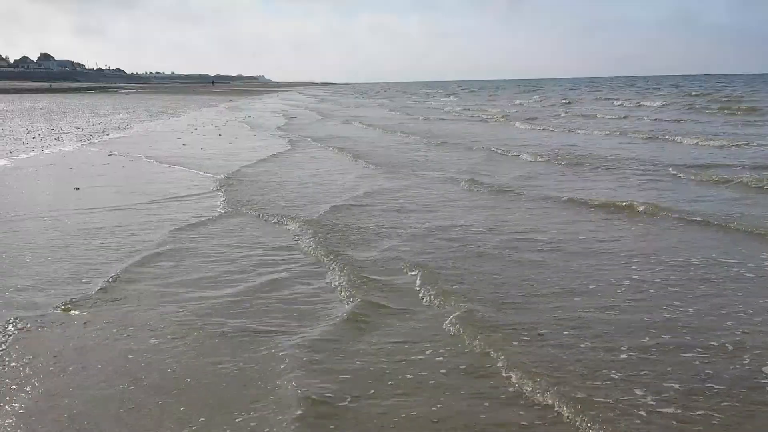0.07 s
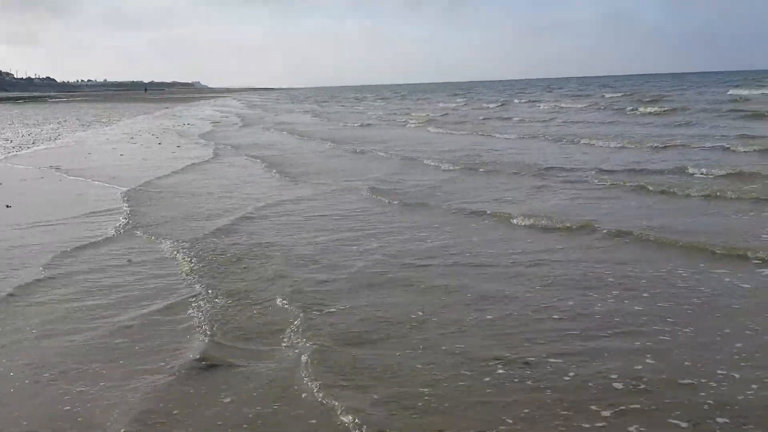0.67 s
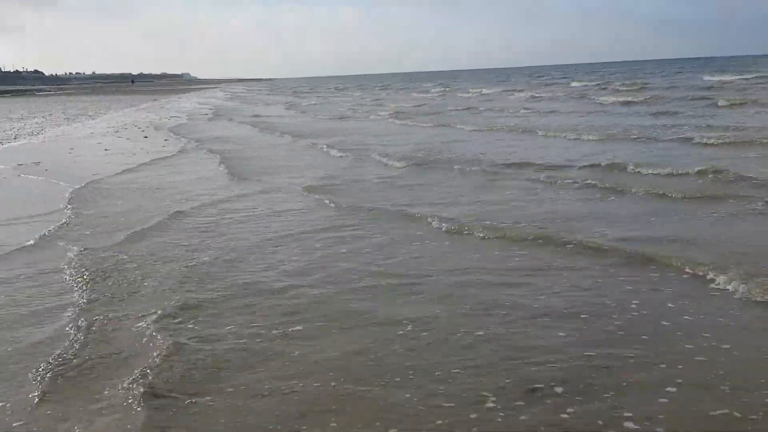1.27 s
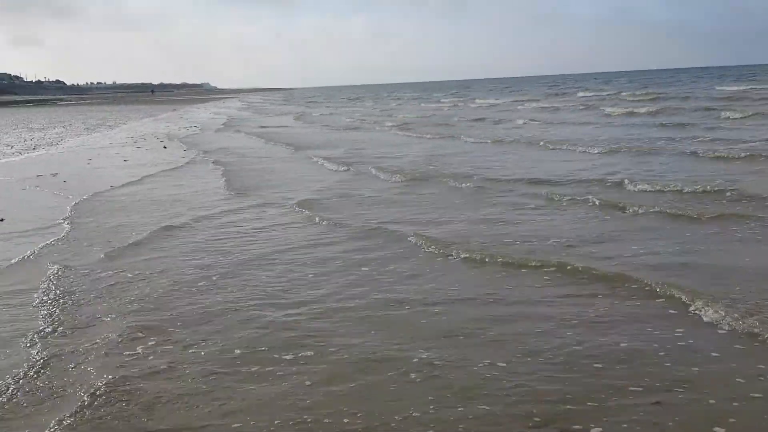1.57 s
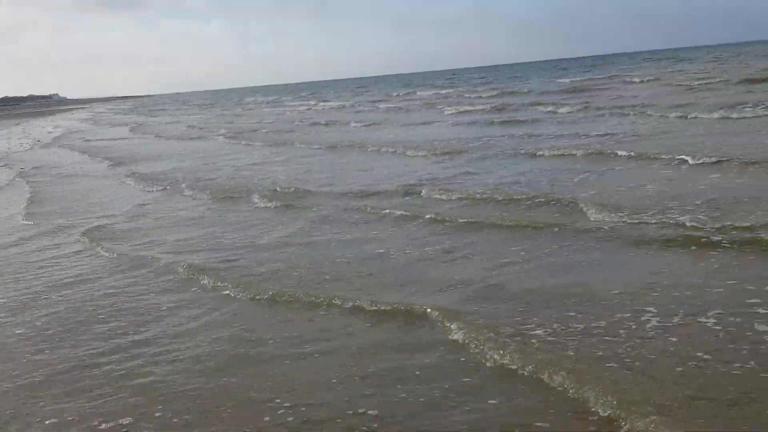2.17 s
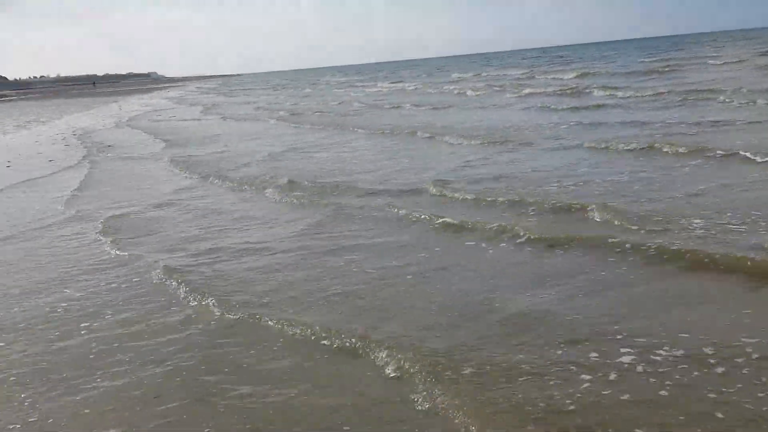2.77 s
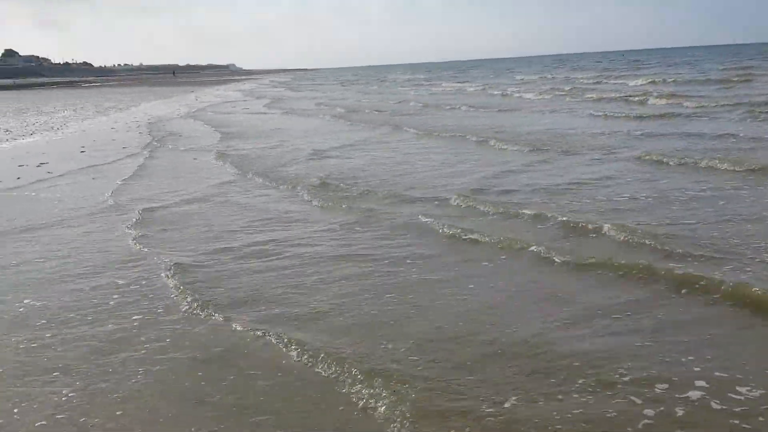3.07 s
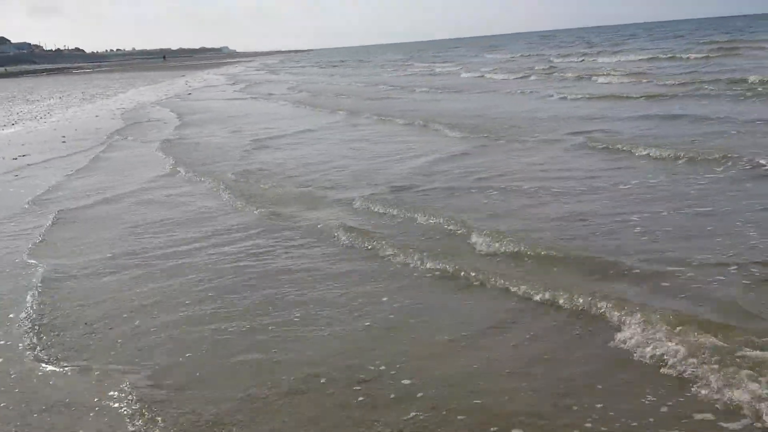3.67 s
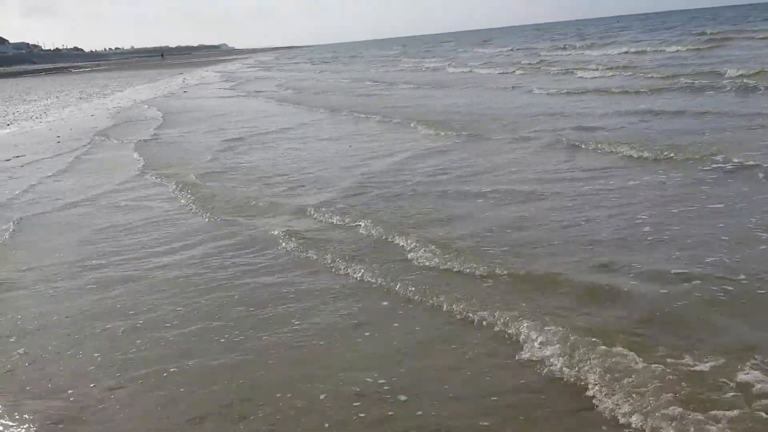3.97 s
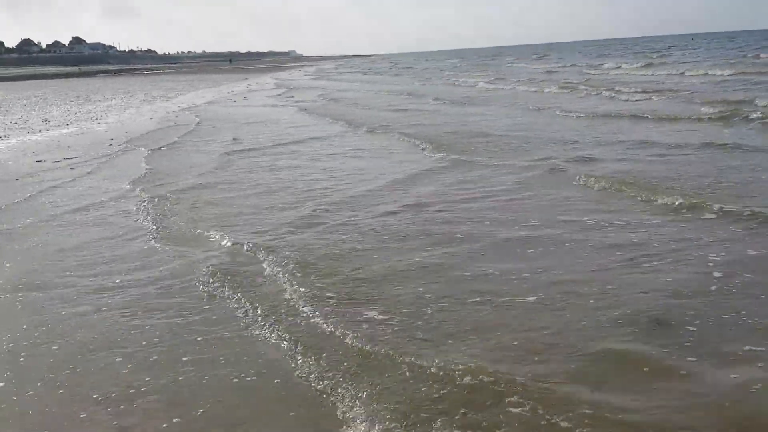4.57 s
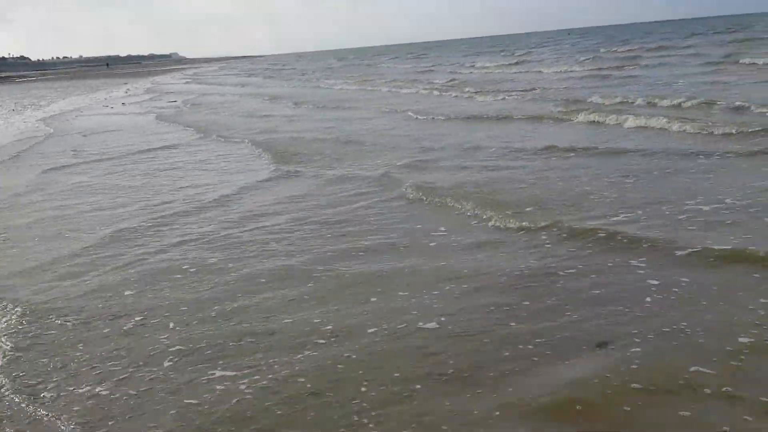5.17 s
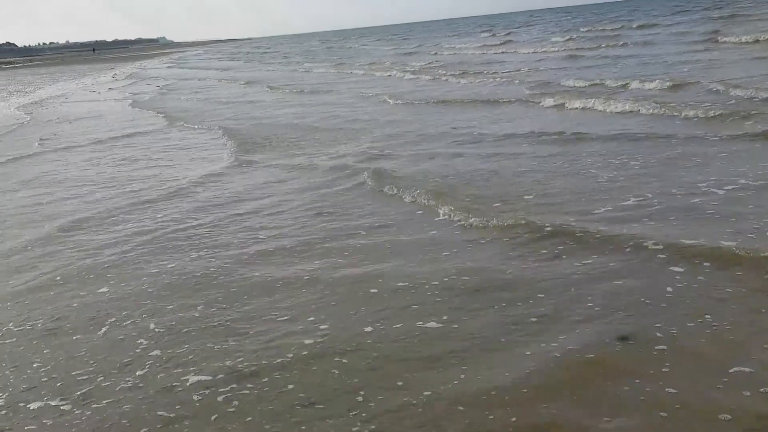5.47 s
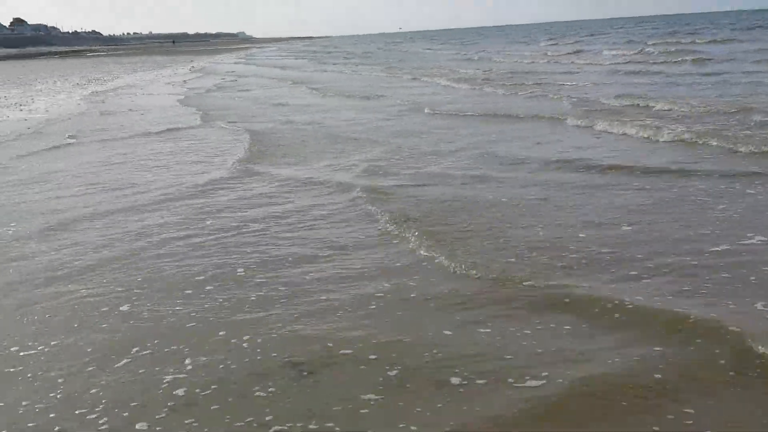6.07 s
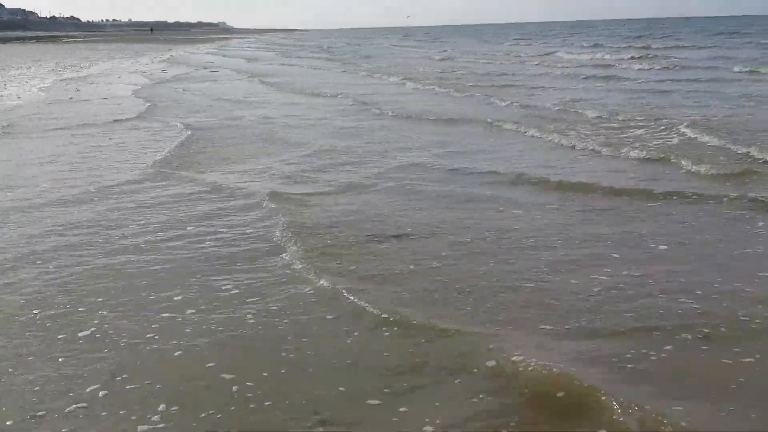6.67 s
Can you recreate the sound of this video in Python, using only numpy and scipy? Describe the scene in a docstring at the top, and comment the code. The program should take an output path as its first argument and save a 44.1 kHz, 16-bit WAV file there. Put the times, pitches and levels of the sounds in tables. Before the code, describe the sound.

After a brief silence, wind and shallow surf come in at about 0.4 seconds. Small waves wash up a flat sandy beach in a continuous foamy rush, swelling with fizz, bubbles and light gurgling as each crest breaks, around 1, 1.8, 2.5, 3.2, 4.8, 5.5 and just after 6 seconds. Tiny close drops tick and splash here and there, notably near 2 and 2.7 seconds, with a few small bubble plops around 3.4 seconds. From about 0.6 seconds a gusty sea breeze buffets the microphone, its low, uneven rumble often louder than the water and shifting between left and right. The gusts break into short rough puffs, thickest and raspiest from about 3.4 to 5.3 seconds. Wind and wash continue until the end at about 7 seconds.

```python
"""Small waves spill and wash up a flat sandy beach: a steady rush of foam, bubbles that thicken
as each crest builds and breaks, a few near drops. A gusty sea breeze buffets the two microphone
ports separately, rumbling and breaking into short rough puffs. The left port is a small cavity
that rings near 6 kHz and colours the water on that side."""
import sys
import numpy as np
from scipy import signal
from scipy.fft import rfft, irfft, next_fast_len
from scipy.io import wavfile
from scipy.ndimage import uniform_filter1d, map_coordinates

SR = 44100
rng = np.random.default_rng(int(sys.argv[2]) if len(sys.argv) > 2 else 0)


def unload_wav(signal):
    """Save mono or channel-first audio to the path in sys.argv[1] as 16-bit WAV at rate SR, clipped to [-1, 1]."""
    wavfile.write(
        sys.argv[1],
        SR,
        np.round(np.clip(np.atleast_2d(signal).T, -1, 1) * 32767).astype(np.int16),
    )


N = 305613

# fineness of the turbulence, as base corner of the rumble: t/s, f/Hz
TURBULENCE = [(0.45, 220), (1.35, 272), (1.8, 254), (2.4, 250), (3.0, 282), (3.7, 316), (4.4, 336),
              (5.0, 342), (5.6, 270), (6.3, 268), (6.9, 229)]
# wind pressure on each port: t/s, level/dB
LEFT_GUSTS = [(0.44, -37), (0.63, -13.5), (0.72, -13), (0.82, -15), (1.07, -17.5), (1.16, -8.5),
              (1.22, -22), (1.35, -12.5), (1.52, -17), (1.67, -21), (1.73, -15.5), (1.79, -21), (1.88, -19),
              (2.33, -28.5), (2.39, -19), (2.51, -11.5), (2.6, -21.5), (2.87, -11), (2.96, -16),
              (3.44, -15), (3.82, -16), (3.92, -23), (4.04, -24), (4.1, -15.5), (4.28, -12.5), (4.52, -19),
              (4.66, -11.5), (5.2, -27.5), (5.26, -16), (5.36, -32), (5.41, -20), (5.71, -16.5),
              (5.77, -18.5), (5.92, -12.5), (6.16, -18), (6.28, -12), (6.34, -19), (6.46, -12), (6.64, -28),
              (6.7, -22), (6.93, -12.5)]
RIGHT_GUSTS = [(0.44, -33.5), (0.62, -18.5), (0.77, -24.5), (0.95, -14.5), (1.13, -26), (1.28, -8.5),
               (1.34, -22), (1.56, -14), (1.7, -24.5), (1.88, -18.5), (1.94, -12.5), (2.0, -20.5),
               (2.12, -15), (2.21, -27), (2.63, -18.5), (2.9, -19), (2.96, -14), (3.26, -12.5), (3.44, -24),
               (3.5, -14), (3.648, -15), (3.83, -12), (4.13, -20.5), (4.4, -20), (4.46, -17), (4.6, -22),
               (4.81, -14.5), (5.17, -16), (5.23, -30), (5.26, -16), (5.47, -27.5), (5.53, -15),
               (5.62, -31), (5.68, -16), (5.72, -24), (5.86, -20.5), (6.3, -17.5), (6.55, -16.5),
               (6.65, -22), (6.93, -19)]
TYPICAL_GUST_DB, TYPICAL_CORNER_HZ = -8.5, 291
# near wavelets: break t/s, level/dB, build/s, hold/s, fall/s, fizz/dB, spray delay/s, churn/dB
# the abrupt falls near 4.25, 4.87 and 6.43 s stand for a limiter ducking under wind puffs
WAVELETS = [(0.52, -38.5, 0.11, 0.12, 0.023, 0, .05, -55), (1.02, -35, 0.13, 0.076, 0.1, 4.5, 0.085, -47),
            (1.43, -42, 0.015, 0.033, 0.024, -1, .03, -48), (1.76, -38, 0.22, 0.14, 0.041, 3, 0.061, -36),
            (2.55, -36, 0.055, 0.2, 0.013, 3.5, 0.025, -41),
            (3.22, -40.5, 0.068, 0.18, 0.038, 3, 0.09, -40.5), (3.98, -45, 0.037, .26, 0.01, 3.5, .01, -48),
            (4.77, -40.5, 0.29, 0.092, 0.01, 0.5, .01, -43), (5.55, -42.5, 0.19, 0.037, 0.1, 3, 0.011, -54),
            (6.10, -39.5, 0.077, 0.071, .012, -0.5, .02, -44),
            (6.26, -39, 0.13, .16, 0.014, 1.5, 0.024, -44), (6.91, -57, 0.034, .05, .03, 5.5, .02, -53)]


def amp(db):
    """Decibels to gain."""
    return 10 ** (np.asarray(db) / 20)


def unit(x):
    """Scale to rms 1."""
    return x / np.sqrt(np.mean(x ** 2) + 1e-20)


def levelled(x):
    """Scale to a running rms of 1."""
    return x / np.sqrt(np.abs(uniform_filter1d(x ** 2, size=2800)) + 1e-9)


def along(points, hz):
    """Read (f/Hz, value) points on a log axis."""
    point_hz, values = np.transpose(points)
    return np.interp(np.log(hz + 1), np.log(point_hz + 1), values)


def curve(points):
    """Read (t/s, value) points at every sample."""
    return np.interp(np.arange(N) / SR, *np.transpose(points))


def wobble(knots_per_s):
    """Smooth random curve."""
    knots = rng.standard_normal(8192)
    return map_coordinates(knots, [np.arange(N) * knots_per_s / SR], mode="wrap")


def filtered(x, response):
    """Apply a gain given as a function of f/Hz."""
    n_fft = next_fast_len(N + 8192)
    return irfft(rfft(x, n_fft) * response(np.fft.rfftfreq(n_fft, 1 / SR)), n_fft)[..., :N]


def coloured(x, spectrum):
    """Shape by (f/Hz, level/dB) points, to rms 1."""
    return unit(filtered(x, lambda hz: amp(along(spectrum, hz))))


def add(track, at_s, sound):
    """Mix a sound into a track."""
    part = track[..., max(round(at_s * SR), 0):][..., :sound.shape[-1]]
    part += sound[..., :part.shape[-1]]


def rumble(gusts, boom):
    """Turbulence at one port: harder wind makes smaller eddies, so the rumble reaches higher."""
    # turbulence spectrum; extra boom of the left port: f/Hz, level/dB
    spectrum = [(15, -39), (30, -36), (50, -13.5), (80, -4.5), (125, 0), (250, -2), (500, -7.5),
                (1000, -13.5), (2500, -25)]
    left_boom = [(30, 17.5), (70, 7), (150, 0), (400, -0.5)]
    buffet_db = 2.5 * wobble(24)
    pressure_db = curve(gusts) - 0.6 + buffet_db
    corner_hz = curve(TURBULENCE) * amp(0.29 * (pressure_db + 14.5) + 2.52 * wobble(110))
    noise = coloured(rng.standard_normal(N), spectrum)
    noise = filtered(noise, lambda hz: amp(boom * along(left_boom, hz)))
    # moving low-pass, by octave bands
    band_hz = 40 * 2 ** np.arange(7)[:, None]
    bands = filtered(noise, lambda hz: np.clip(1 - np.abs(np.log2(np.maximum(hz, 40) / band_hz)), 0, 1))
    flow = levelled(np.sum(bands / np.sqrt(1 + (band_hz / corner_hz) ** 4), axis=0))
    # pressure grows faster than air speed: fast swirls become lopsided kicks
    kicks = flow * (1 + 0.29 * np.abs(flow)) - 0.1 * (flow ** 2 - 1)
    # the slowest swells below about 24 Hz fall away
    vented = filtered(kicks, lambda hz: hz ** 2 / (hz ** 2 + 24 ** 2))
    return levelled(vented) * amp(pressure_db)


def lesser_eddies(port, count=160, typical_db=-22, scatter_db=8, typical_s=0.0028):
    """Random eddy rows for one port, stronger in gusts and in fine turbulence."""
    place, size, stretch = rng.uniform(-0.944, 1, (count, 3)).T
    at = ((np.arange(count) + (place + 1) / 2) / count * (N - 1)).astype(int)
    gust_db = curve((LEFT_GUSTS, RIGHT_GUSTS)[port])[at] - TYPICAL_GUST_DB
    fineness_oct = np.log2(curve(TURBULENCE)[at] / TYPICAL_CORNER_HZ)
    level_db = typical_db + 0.39 * gust_db + 4.5 * fineness_oct + scatter_db * size
    return list(zip(at / SR, np.full(count, port), level_db, typical_s * 2 ** stretch))


def puffs(rasp_hz=900, rasp_db_per_oct=9):
    """Eddies tear past one port as ragged pressure bursts, raspier in fine turbulence."""
    # strongest eddies: t/s, port (0 left, 1 right), level/dB, length/s
    strong_eddies = [(0.583, 0, -19, 0.0043), (0.678, 0, -5, 0.0025), (0.944, 1, -17, 0.0056),
                     (1.128, 0, -8.5, 0.0016), (1.166, 0, -11.5, 0.007), (1.226, 1, -13, .004),
                     (1.265, 1, -21, 0.013), (1.57, 1, -18, 0.0064), (1.938, 1, -6.5, 0.0073),
                     (2.15, 1, -12, 0.0057), (2.61, 1, -12.5, 0.015), (2.944, 1, -9.5, 0.0037),
                     (3.015, 1, -5, 0.0013), (3.074, 0, -13, 0.0048), (3.33, 0, -14, 0.015),
                     (3.397, 0, -9, 0.0022), (3.42, 0, -8.5, .003), (3.447, 0, -7, 0.0035),
                     (3.501, 1, -10, 0.0036), (3.508, 0, -9, 0.002), (3.519, 1, -11, 0.0046),
                     (3.537, 1, -8, 0.0028), (3.543, 1, -2, 0.0027), (3.585, 0, -17, .003),
                     (3.687, 0, -10, 0.0022), (3.752, 1, -9.5, 0.0042), (3.765, 1, -10, 0.0018),
                     (3.799, 1, -5.5, 0.0024), (3.809, 1, -5.5, 0.0038), (3.815, 0, -4, 0.0022),
                     (3.846, 1, -5, .002), (3.86, 1, -14, 0.0051), (3.902, 1, -0.5, 0.0018),
                     (3.958, 1, -4, 0.0017), (3.963, 1, -10, 0.0014), (4.023, 1, -12.5, .003),
                     (4.077, 1, -11, 0.004), (4.103, 0, -6.5, 0.0047), (4.15, 0, -14.5, 0.0057),
                     (4.17, 1, -18, 0.0039), (4.209, 0, -7, 0.0037), (4.218, 0, -13, 0.0026),
                     (4.222, 1, -11, 0.0033), (4.258, 0, -16, 0.0036), (4.321, 0, -20, .004),
                     (4.352, 0, -11.5, 0.013), (4.384, 0, -10.5, 0.0033), (4.444, 0, -11.5, 0.011),
                     (4.462, 1, -12, 0.0032), (4.475, 1, -9, .008), (4.485, 1, -8, 0.0036),
                     (4.551, 0, -19, 0.011), (4.688, 0, -21, 0.016), (4.709, 1, -9, 0.006),
                     (4.767, 0, -20, .01), (4.783, 1, -14, .003), (4.795, 1, -11, 0.0048),
                     (4.837, 1, -12, 0.0034), (4.844, 1, -15, 0.0033), (4.846, 0, -18.5, 0.026),
                     (4.884, 0, -8.5, 0.004), (4.89, 0, 0.5, 0.0026), (4.921, 1, -11, 0.003),
                     (4.932, 1, -14.5, .002), (5.001, 1, -10.5, 0.003), (5.076, 1, -19, 0.0062),
                     (5.139, 1, -11.5, 0.0038), (5.169, 1, -9, 0.007), (5.199, 1, -6, 0.0018),
                     (5.29, 1, -17, 0.015), (5.308, 1, -15, 0.0042), (5.319, 1, -9.5, 0.0042),
                     (5.335, 1, -13, 0.011), (5.489, 0, -14.5, 0.0046), (5.663, 1, -18, 0.018),
                     (5.806, 0, -12, 0.0075), (5.864, 1, -7, 0.0031), (5.911, 0, -17.5, 0.015),
                     (5.979, 0, -7.5, 0.0034), (6.052, 0, -11, 0.0046), (6.195, 0, -5.5, 0.0035),
                     (6.245, 0, -8, 0.011), (6.318, 1, -9, 0.011), (6.471, 1, -13, 0.0093),
                     (6.564, 1, -10.5, .005), (6.571, 0, -12.5, 0.005)]
    # puff spectrum: f/Hz, level/dB
    spectrum = [(60, -1), (150, -8.5), (300, 6.5), (500, 3), (750, -3), (1050, -8), (1500, -17.5),
                (2200, -30.5), (4000, -71), (8000, -80)]
    out, t = np.zeros((2, N)), np.arange(N) / SR
    ragged = amp(4 * np.array([wobble(170), wobble(170)]))
    flutter = coloured(rng.standard_normal((2, N)), spectrum)
    rasp = filtered(flutter, lambda hz: 1 / (1 + (rasp_hz / (hz + 1)) ** 4))
    rasp_gain = amp(rasp_db_per_oct * np.log2(curve(TURBULENCE) / TYPICAL_CORNER_HZ))
    flutter = ragged * (flutter + rasp * (rasp_gain - 1))
    for at_s, port, level_db, length_s in strong_eddies + lesser_eddies(0) + lesser_eddies(1):
        near = slice(*np.searchsorted(t, [at_s - 5 * length_s, at_s + 5 * length_s]))
        swell = 1 / (1 + 2.44 * ((t[near] - at_s) / length_s) ** 2) ** 1.15  # tight core, weak skirt
        burst = unit(swell * flutter[int(port), near]) * np.sqrt(np.mean(swell ** 2))
        out[int(port), near] += amp(level_db) * burst
    return out


def drops(attack_s=0.0006):
    """Near drops open the surface and smack with a tiny burst of spray, small ones brighter."""
    # impacts: t/s, level/dB, tilt/(dB/octave), t60/s, left minus right/dB
    impacts = [(0.7086, -16.5, -2, 0.013, 12.5), (1.017, -19, 3, .018, -3), (1.09, -16, 0, .02, 0),
               (1.123, -14, 1, .02, 5), (1.134, -17, -3, .012, 4), (1.152, -17, 2, .015, 7),
               (1.186, -17.5, 5, .018, 0), (1.208, -14.5, -5, 0.013, 2), (1.219, -19, -9.5, 0.015, 2),
               (1.325, -22, -6, .012, 4), (1.423, -19, 1, 0.02, 3), (1.463, -24, 12, .018, 2),
               (1.551, -19, -2, 0.015, 5), (1.612, -15.5, -5, 0.034, 1), (1.755, -28, 0, .01, -6),
               (1.895, -19, 2, .012, 2), (1.980, -13, -2, 0.013, -3), (1.9916, -6, -2, 0.0093, 2),
               (2.013, -18.5, -2, 0.019, 0), (2.111, -31, 9, .01, 0), (2.567, -15, 5, .014, -2),
               (2.612, -14, -7, 0.019, -5), (2.621, -14, 0, .012, 0), (2.662, -15, 5, 0.022, 0),
               (2.724, -14, 4, .012, 2), (2.732, -15.5, 8, .01, 2), (2.745, -16, 4, 0.013, -4),
               (2.774, -20, -2, .014, 2), (3.117, -24, 3, .012, -2), (3.304, -19, 7, .016, -2),
               (3.363, -15, -4, 0.021, -3), (3.402, -16, -3, 0.013, 2), (3.455, -16, -3, 0.013, -1),
               (3.469, -19, -7, 0.016, 1), (3.925, -29, 10, .012, -7), (3.977, -21, 1, .012, 4),
               (4.252, -23, 5, 0.011, -9), (4.729, -23, 3, .012, -5), (4.774, -22, 13, .012, 3),
               (4.822, -20, 3, .012, -3), (4.852, -17, -7, 0.02, 0), (5.246, -31, 12, .014, -3),
               (5.381, -21.5, -6, .012, -1), (5.47, -29, 8, .012, -5), (5.538, -22.5, 0, .012, -2),
               (5.548, -23, 10, .012, 0), (5.789, -35, 11, 0.011, 0), (6.153, -22, -7, .012, 7),
               (6.168, -21, -2, .014, 4), (6.243, -18, 5, 0.011, -5), (6.33, -20, -2, .014, 4),
               (6.341, -19, 8, 0.016, -2), (6.367, -19, 9, .016, -2), (6.413, -27, 14, .014, -3),
               (6.478, -30, 11, .012, -3), (6.739, -25, 0, .012, 1), (6.888, -24, -4, .012, 5)]
    colour_hz_db = [(1000, -3), (4000, -5.5), (7000, 6.5), (10000, -5), (15000, -18)]
    out, t = np.zeros((2, N)), np.arange(SR // 25) / SR
    octaves = np.log2(np.clip(np.fft.rfftfreq(len(t), 1 / SR), 2000, 12000) / 6000)
    for at_s, level_db, tilt_db, t60_s, pan_db in impacts:
        spray = irfft(rfft(rng.standard_normal((2, len(t)))) * amp(tilt_db * octaves), len(t))
        sides = amp([[pan_db / 2], [-pan_db / 2]])
        envelope = amp(level_db - 60 * t / t60_s) * (1 - np.exp(-t / attack_s))
        add(out, at_s, sides * envelope * spray)
    return filtered(out, lambda hz: amp(along(colour_hz_db, hz)))


def gulps(attack_s=0.00035):
    """Air trapped under a crest rings with a rising bubble note."""
    # air pockets: t/s, f/Hz, level/dB, t60/s
    pockets = [(1.322, 2250, -31, 0.014), (1.613, 2270, -30, 0.018), (1.655, 1890, -32, 0.021),
               (2.775, 1923, -29, 0.02), (2.794, 1460, -23.5, 0.025), (2.808, 1580, -32, 0.017),
               (3.186, 2060, -20, 0.014), (3.357, 1530, -11, 0.0073), (3.371, 2290, -15.5, 0.019),
               (3.378, 2660, -21, .011), (4.102, 3880, -26, .025), (4.214, 2000, -25, 0.016),
               (5.019, 1760, -20, 0.0099), (5.579, 3700, -10.5, 0.004), (5.583, 3000, -28, .02),
               (5.600, 2600, -24, .015), (6.150, 2380, -25, .015)]
    out, t = np.zeros((2, N)), np.arange(SR // 25) / SR
    for at_s, hz, level_db, t60_s in pockets:
        note = np.sin(2 * np.pi * hz * t * (1 + 0.1 * np.minimum(t / t60_s, 1)))
        envelope = amp(level_db - 60 * t / t60_s) * (1 - np.exp(-t / attack_s))
        add(out, at_s, envelope * note)
    return out


def bubbles(count, centre_hz, spread, cycles, scatter_db, rise, samples):
    """Stereo bubble cloud at rms 1: damped sines whose pitch rises as they near the surface."""
    t = np.arange(samples) / SR
    when, where, polarity = rng.random((3, count, 1))
    hz = np.clip(centre_hz * np.exp(spread * rng.standard_normal((count, 1))), 500, 16000)
    gain = amp(scatter_db * np.minimum(rng.exponential(size=(count, 1)), 4.5))
    age = hz * t / cycles
    envelope = gain * np.exp(-age) * (1 - t / t[-1])
    ring = envelope * np.sin(2 * np.pi * hz * t * (1 + rise * np.minimum(age, 2)))
    ring *= np.sign(polarity - 0.5) * np.sqrt(hz / centre_hz)
    at = (when * N).astype(int) + np.arange(samples)
    lag = (where * 28).astype(int)  # wide shore: each bubble has its own delay between the ports
    left = np.bincount((at + 14).ravel(), ring.ravel(), N)[:N]
    right = np.bincount((at + lag).ravel(), ring.ravel(), N)[:N]
    return unit(np.array([left, right]))


def foam(patchy_db):
    """Countless far bubbles merge into a patchy white rush, partly shared by both ports."""
    # left-right likeness: f/Hz, correlation/0-1
    correlation = [(300, 1), (1500, 0.21), (4000, 0.22), (8000, 0.07)]
    spectra = signal.stft(rng.standard_normal((2, N)), nperseg=512)[2]
    patches = uniform_filter1d(rng.standard_normal(spectra.shape[1:]), size=7, axis=0)
    patches = uniform_filter1d(patches, size=6, axis=1)
    pair = signal.istft(spectra * amp(patchy_db * unit(patches)), nperseg=512)[1][:, :N]
    width_rad = lambda hz: np.arccos(np.clip(along(correlation, hz), -1, 1)) / 2
    mid, side = filtered(pair, lambda hz: np.array([np.cos(width_rad(hz)), np.sin(width_rad(hz))]))
    return unit(np.array([mid + side, mid - side]))


def wavelet_swell(break_s, build_s, hold_s, fall_s):
    """Envelope of a wavelet's sound: it builds, holds and falls away."""
    t = np.arange(N) / SR - break_s
    return np.exp(np.minimum(t, 0) / build_s - np.maximum(t - hold_s, 0) / fall_s)


def churning():
    """Toppling wavelets fold in large bubbles that give a hollow midrange."""
    swell = sum(amp(churn_db) * wavelet_swell(break_s, build_s, hold_s, fall_s)
                for break_s, _, build_s, hold_s, fall_s, _, _, churn_db in WAVELETS)
    return swell * bubbles(2200, 1427, spread=0.36, cycles=5.3, scatter_db=1, rise=0.062, samples=360)


def sea_state(wash_fizz_db=-1.8):
    """Water level and fizz in dB: wavelets ride on the duller wash, each followed by its spray."""
    # wash along the whole shore: t/s, level/dB
    wash = [(0.43, -47.5), (0.8, -39), (1.35, -41.5), (2.2, -39.5), (3.1, -39.5), (3.75, -42.5),
            (4.35, -47), (5.1, -43), (5.9, -44), (6.5, -42), (6.93, -36)]
    power, fizz_db = amp(curve(wash)) ** 2, wash_fizz_db
    for break_s, level_db, *shape_s, spray_db, delay_s, _ in WAVELETS:
        power += (amp(level_db) * wavelet_swell(break_s, *shape_s)) ** 2
        fizz_db += spray_db * wavelet_swell(break_s + delay_s, *shape_s)
    return 10 * np.log10(power), fizz_db


def surf(gain_db=7, crest_from_db=-38, fizz_hz=5000):
    """Foam, spray and bubbles swell together; a breaking crest is grainier and throws finer spray."""
    # spectra of the foam and of its finest crackle: f/Hz, level/dB
    foam_spectrum = [(100, 15), (300, -0.5), (800, 8.5), (1150, 5), (1600, 3.5), (2200, 3), (3000, 0.5),
                     (4600, -0.5), (7000, 1), (8500, -1.5), (10000, -5.5), (12000, -11.5), (14500, -25)]
    crackle_spectrum = [(3000, -22), (6000, 5), (9000, -8), (12000, -1), (14500, -7)]
    level_db, fizz_db = sea_state()
    crest_db = level_db - crest_from_db
    spray = bubbles(7500, 6420, spread=0.535, cycles=2.5, scatter_db=2.5, rise=0.035, samples=128)
    babble = bubbles(5000, 2259, spread=0.525, cycles=4.9, scatter_db=3, rise=0.043, samples=400)
    grain = amp(0.13 * crest_db) * (amp(-12) * spray + amp(-13.5) * babble)
    water = coloured(foam(patchy_db=1.8) + grain, foam_spectrum)
    fizz = filtered(water, lambda hz: 1 / (1 + (fizz_hz / (hz + 1)) ** 8))
    water += fizz * (amp(fizz_db) - 1)
    # a crest sheds fine droplets, throws coarse spatter ahead and folds in air that gurgles
    droplets = bubbles(7000, 9950, spread=0.22, cycles=4.5, scatter_db=4.5, rise=0, samples=96)
    water += coloured(droplets, crackle_spectrum) * amp(fizz_db - 21.5 + 1.6 * crest_db)
    spatter = bubbles(2500, 3290, spread=0.18, cycles=1.7, scatter_db=4, rise=0.055, samples=160)
    clumps = unit(amp(11 * wobble(60)))
    water += clumps * spatter * amp(-18 + 2.5 * crest_db)
    gurgle = bubbles(1500, 1966, spread=0.31, cycles=10.2, scatter_db=3, rise=0.12, samples=400)
    water += gurgle * amp(-18.5 + 1.6 * crest_db)
    flicker_db = 0.94 * wobble(70) + 0.74 * wobble(16)
    return water * amp(level_db + gain_db + flicker_db)


def scene():
    """The water is heard through the ports; the wind strikes them directly."""
    # cavity response of the left port: f/Hz, level/dB
    left_port = [(400, 3.5), (1100, 2.5), (1600, 5.5), (2200, 5), (3000, 5), (3800, 3), (4600, 1.5),
                 (5400, 8), (6100, 10.5), (7000, 1.5), (8500, -5.5), (10000, -7.5), (12500, -14),
                 (14500, -31)]
    water = surf() + churning() + drops() + gulps()
    water = filtered(water, lambda hz: amp([along(left_port, hz), np.zeros_like(hz)]))
    wind = np.array([rumble(LEFT_GUSTS, boom=True), rumble(RIGHT_GUSTS, boom=False)])
    return water + wind + puffs()


def record(dry, start_s=0.425, fade_s=0.006, ceiling=0.93, top_hz=15000):
    """Open after a short silence, round off the tallest peaks, low-pass steeply."""
    opening = np.clip((np.arange(N) / SR - start_s) / fade_s, 0, 1)
    rounded = dry / (1 + np.abs(dry / ceiling) ** 6) ** (1 / 6)
    return filtered(rounded * opening, lambda hz: 1 / (1 + (hz / top_hz) ** 120))


dry = scene()
out = record(dry)
unload_wav(out)
```